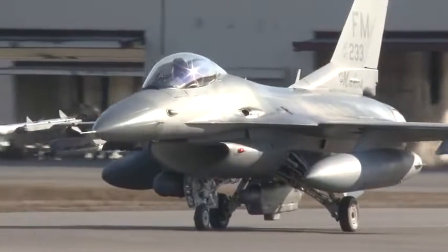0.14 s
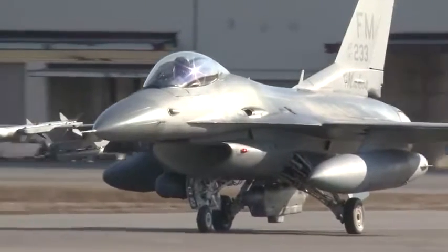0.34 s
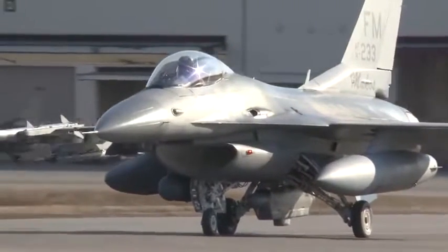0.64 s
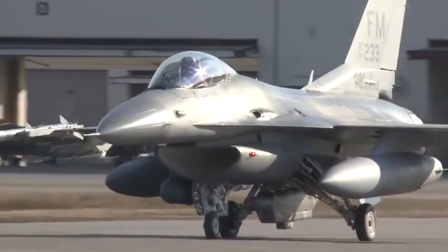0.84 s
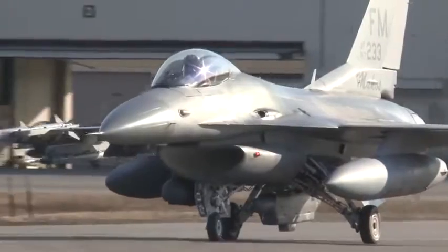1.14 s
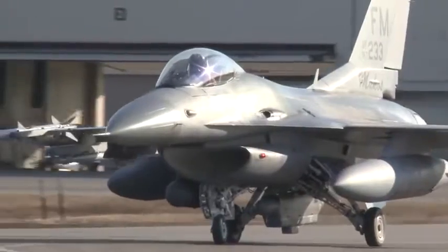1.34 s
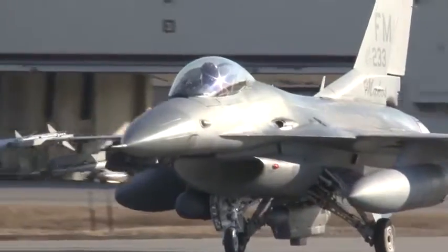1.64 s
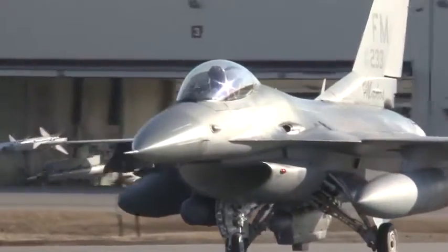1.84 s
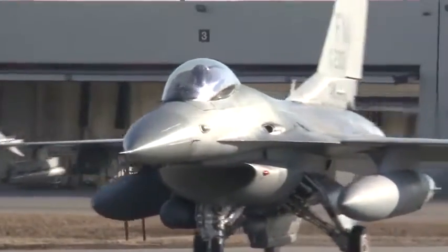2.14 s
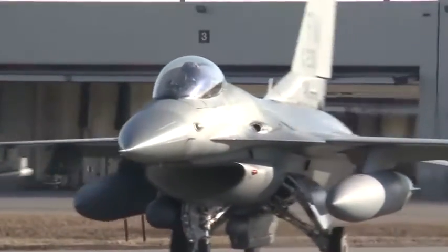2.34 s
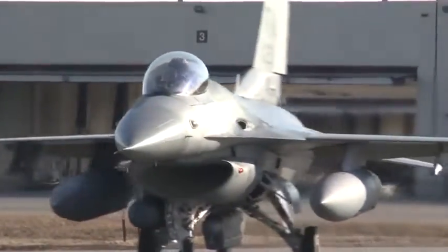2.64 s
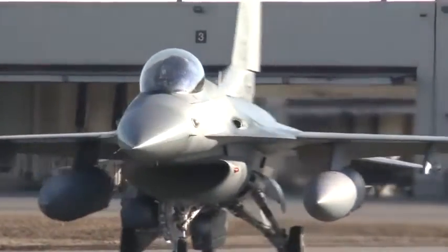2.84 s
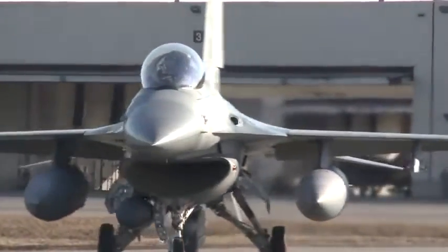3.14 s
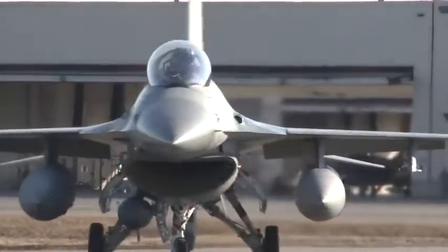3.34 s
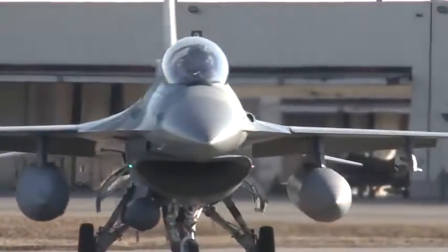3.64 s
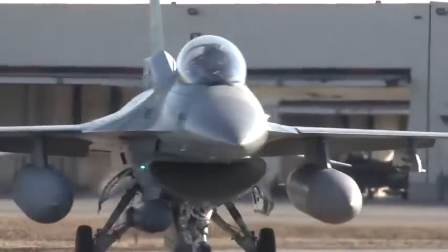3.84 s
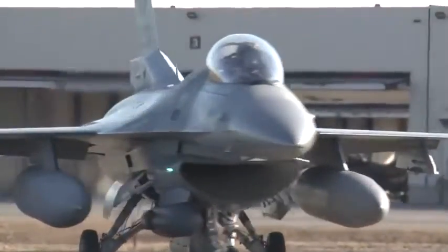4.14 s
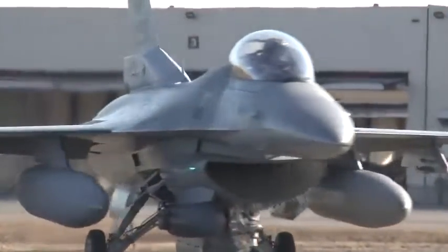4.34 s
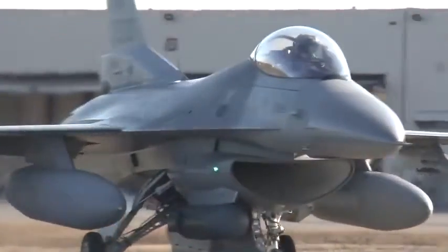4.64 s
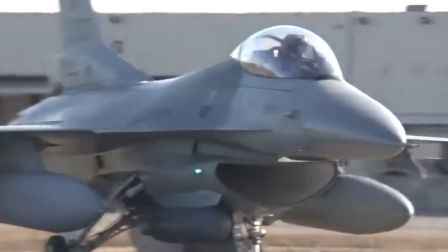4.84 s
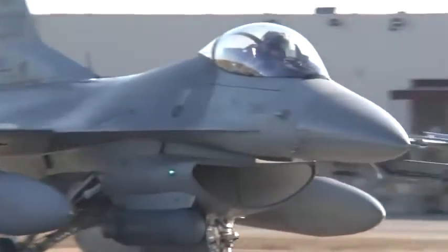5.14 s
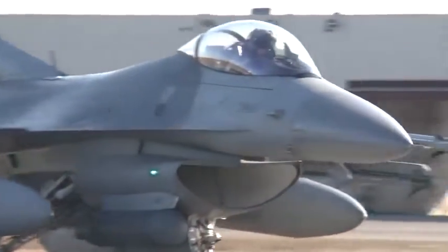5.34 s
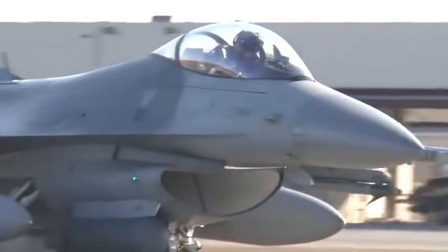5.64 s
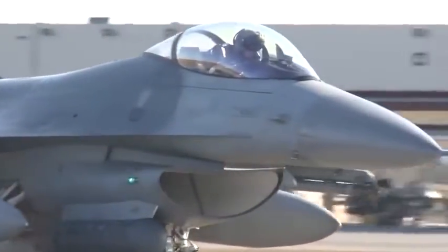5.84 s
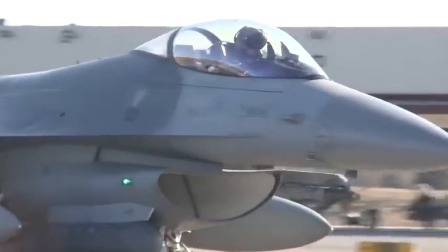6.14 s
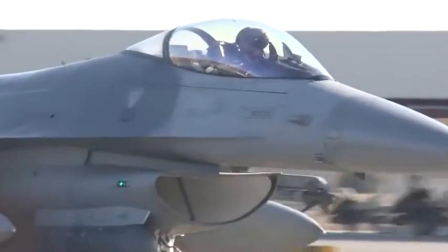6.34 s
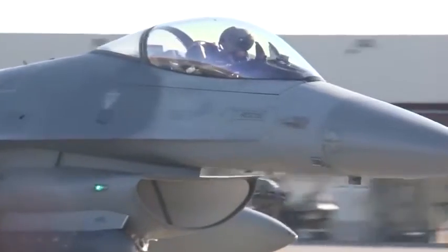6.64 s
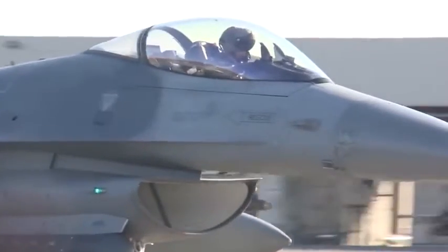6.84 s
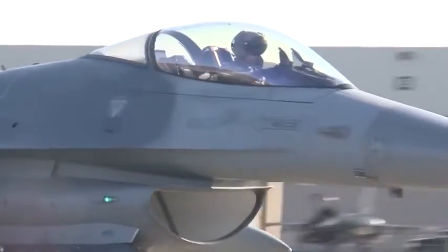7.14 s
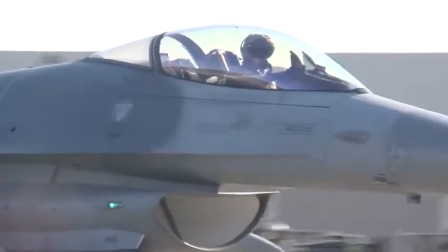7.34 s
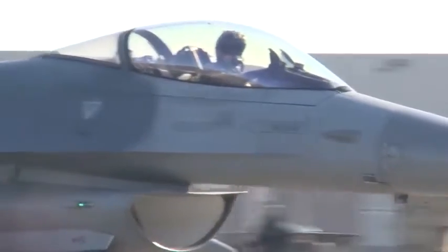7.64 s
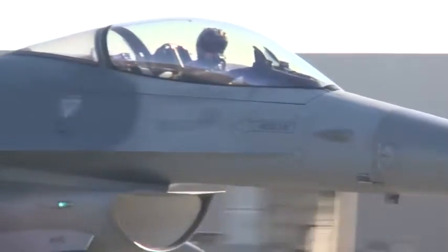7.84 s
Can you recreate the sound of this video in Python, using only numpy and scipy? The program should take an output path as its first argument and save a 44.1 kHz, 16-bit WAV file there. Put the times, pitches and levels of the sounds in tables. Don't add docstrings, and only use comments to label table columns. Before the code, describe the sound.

A fighter jet taxis on an open airfield, heard continuously from start to finish. From 0 s a piercing fan whine near 1.84 kHz stands over gusty inlet roar, light hiss and a soft low rumble. The whine swells around 1.3 s, sinks very slightly in pitch, and is lowest and purest near 3.5 s, when the intake faces the listener and the rumble almost vanishes. From about 4.5 s it climbs slightly, then dips briefly in strength around 5.5 and 6 s. As the jet swings side-on, the tone blurs into a rougher, wider buzz; by 7 to 8 s hiss, sizzle and exhaust rumble are strongest, and the sound stays on without an ending. Thin shimmering tones from distant idling engines come and go. The image leans left, diffuse and phasey, with treble cut off steeply and patchy, flickering highs.

```python
import sys
import numpy as np
from scipy import signal
from scipy.fft import rfft, irfft, next_fast_len
from scipy.io import wavfile
from scipy.ndimage import uniform_filter1d, map_coordinates

SR = 44100
rng = np.random.default_rng(int(sys.argv[2]) if len(sys.argv) > 2 else 0)


def generate_wav(sig):
    pcm = np.round(np.clip(np.atleast_2d(sig).T, -1, 1) * 32767).astype(np.int16)
    wavfile.write(sys.argv[1], SR, pcm)


def field_ratio(decibels):
    return 10 ** (np.asarray(decibels, dtype=float) / 20)


N = 352800


def unit(x):
    return x / np.sqrt(np.mean(np.abs(x) ** 2) + 1e-20)


def along(points, hz):
    f, v = np.transpose(points)
    return np.interp(np.log(hz + 1), np.log(f + 1), v, left=-120, right=-120)


def curves(rows):
    s, *cols = np.transpose(rows)
    return [np.interp(np.arange(N) / SR, s, c) for c in cols]


def wobble(rate):
    knots = rng.standard_normal(400)
    return map_coordinates(knots, [np.arange(N) * np.clip(rate, 0, 45) / SR])


def filtered(x, response):
    m = next_fast_len(N + SR // 2)
    return irfft(rfft(x, m) * response(np.fft.rfftfreq(m, 1 / SR)), m)[..., :N]


def patched(x, patchy_db, tall=8, long=6):
    z = signal.stft(x, nperseg=512)[2]
    field = uniform_filter1d(rng.standard_normal(z.shape), size=tall, axis=0)
    field = uniform_filter1d(field, size=long, axis=1)
    return signal.istft(z * field_ratio(patchy_db * unit(field)), nperseg=512)[1][:N]


def rush(spectrum, patchy_db, **shape):
    noise = patched(rng.standard_normal(N), patchy_db, **shape)
    return unit(filtered(noise, lambda hz: field_ratio(along(spectrum, hz))))


def scatter(blur_hz, count=9000):
    hz = np.fft.fftfreq(count, N / SR / count)
    white = rng.standard_normal(count) + 1j * rng.standard_normal(count)
    sway = unit(np.fft.ifft(white * np.exp(-(hz / blur_hz) ** 2)))
    return np.interp(np.arange(N) * count / N, np.arange(count), sway)


def tones(lines):
    t = np.arange(N) / SR
    return sum(field_ratio(db) * (scatter(blur_hz=25) * np.exp(2j * np.pi * hz * t)).real for hz, db in lines)


# time in seconds, level in dB.
WHINE_LEVEL = [(0, -32.5), (.4, -30.5), (.65, -33), (.95, -30), (1.25, -26.5), (1.5, -32), (2.0, -29.5),
               (2.8, -31.5), (4.3, -32.5), (4.75, -30), (5.2, -29), (5.5, -36), (5.68, -32.5), (5.95, -39),
               (6.2, -32), (6.65, -32), (7.1, -32.5), (8, -34.5)]
# time in seconds, blade tone in Hz, core blur in Hz, wide skirt in dB.
WHINE_PITCH = [
    (0, 1838, 30, -9),
    (1.5, 1829, 28, -11),
    (2.5, 1825, 26, -11),
    (3.5, 1822, 23, -12),
    (4.5, 1831, 32, -9),
    (5.5, 1838, 36, -6),
    (6.5, 1840, 42, -3),
    (7.1, 1845, 48, 0),
    (8, 1845, 50, 2),
]
# multiple of the blade tone, level in dB, blur in Hz.
OVERTONES = [
    (2, -52, 36),
    (3, -72, 120),
]


def fan():
    tone_hz, blur, skirt_db = curves(WHINE_PITCH)
    level_db, = curves(WHINE_LEVEL)
    turn = 2j * np.pi * np.cumsum(tone_hz) / SR
    share = np.clip((blur - 20) / 30, 0, 1)
    core = np.sqrt(1 - share) * scatter(blur_hz=28) + np.sqrt(share) * scatter(blur_hz=61.7)
    core = unit(core / (np.abs(core) + 2.4) ** 0.48)

    fade_db, fades_per_s, steady_s = 1.6, 22, .25
    whine = field_ratio(fade_db * wobble(fades_per_s)) * core
    near_skirt = field_ratio(1.23 * skirt_db + 1.0) * scatter(blur_hz=114)
    far_skirt = field_ratio(2.8 * skirt_db - 2.5) * scatter(blur_hz=260)
    whine = whine + near_skirt * np.exp(.012 * turn)
    whine = whine + far_skirt * np.exp(.03 * turn)
    whine = whine / np.sqrt(uniform_filter1d(np.abs(whine) ** 2, size=round(steady_s * SR)))

    octave = field_ratio(.9 * skirt_db - 47) * scatter(blur_hz=100) * np.exp(2.05 * turn)
    facing_db = -.3 * (skirt_db + 10)
    clear = sum(field_ratio(db + facing_db) * scatter(blur_hz) * np.exp(k * turn) for k, db, blur_hz in OVERTONES)
    whine_db = level_db + 5.5
    return (field_ratio(whine_db) * whine * np.exp(turn) + octave + clear).real


# time in seconds, level in dB.
INLET_LEVEL = [(0.0, -42), (0.11, -38.5), (0.27, -41.5), (0.82, -46.5), (1.72, -43), (1.89, -38),
               (2.14, -43), (2.69, -41.5), (4.14, -43), (4.63, -37.5), (5.5, -40), (5.64, -37), (5.97, -42),
               (6.24, -37.5), (6.71, -41), (7.24, -37), (7.48, -40.5), (8.0, -39)]
# frequency in Hz, density in dB per Hz.
ROAR = [(1500, -12), (1700, -6.5), (1950, 3.5), (2080, -5), (2350, 3), (2500, -2.5), (2640, 0), (3080, -13),
        (3450, -5.5), (3750, -7), (4100, -15.5), (4500, -18), (5020, -31), (5200, -47)]
HISS = [(3700, -43), (4200, -3), (4700, -7), (5030, -7), (5500, -0.5), (6000, -5), (7000, -9.5), (7750, -8),
        (8400, -10.5), (9000, -14), (9750, -18), (9850, -56)]
SIZZLE = [(9500, -40), (9800, -3.5), (10060, -1.5), (10300, -3), (10500, -3.5), (11200, -7), (11400, -9),
          (13100, -12), (13400, -16), (14500, -11.5), (15800, -15), (16000, -14)]
# frequency in Hz, level against their noise in dB.
HISS_LINES = [(5515, -19)]
SIZZLE_LINES = [(10063, -13), (10500, -21)]


def inlet():
    roar_db, = curves(INLET_LEVEL)
    flicker = wobble(14) + 0.26 * wobble(7.7)
    roar = field_ratio(roar_db + 3 + 0.79 * flicker) * rush(ROAR, patchy_db=0.55)
    hiss = rush(HISS, patchy_db=-0.25, tall=24, long=4) + tones(HISS_LINES)
    sizzle = rush(SIZZLE, patchy_db=1.5, tall=24, long=4) + tones(SIZZLE_LINES)
    hiss_db = -54.5 + follow(inlet=0.25, nearness=0.67, nozzle=0.27)
    hiss_db = hiss_db + .8 * flicker + .5 * wobble(9)
    sizzle_db = -62.5 + follow(inlet=0.71, nearness=0.97, nozzle=0.18)
    sizzle_db = sizzle_db + .8 * flicker + .4 * wobble(6)
    return roar + field_ratio(hiss_db) * hiss + field_ratio(sizzle_db) * sizzle


# time in seconds, level in dB.
NOZZLE_LEVEL = [(0.0, -45), (0.44, -49.5), (0.78, -45), (0.93, -53.5), (0.98, -46), (1.76, -54.5),
                (1.94, -48.5), (2.07, -55.5), (2.85, -59.5), (4.19, -59), (4.45, -53), (5.21, -55),
                (6.71, -48.5), (6.97, -45), (7.82, -44), (8.0, -39)]
# frequency in Hz, density in dB per Hz.
RUMBLE = [(15, -66), (25, -45), (65, -20.5), (188, -1.5), (205, -2), (286, -8.5), (345, -10), (382, -6),
          (468, -11.5), (625, -10), (800, -20), (1040, -55), (1760, -120)]
BODY = [(180, -26), (300, -8), (419, -4), (574, -5.5), (625, -4.5), (906, -5.5), (1050, -3.5), (1360, -8.5),
        (1650, -3.5), (2140, -42), (3630, -120)]


def exhaust():
    nozzle_db, = curves(NOZZLE_LEVEL)
    rumble_db = nozzle_db + 3 + 0.59 * wobble(7.4)
    rumble = field_ratio(rumble_db) * rush(RUMBLE, patchy_db=-0.2)
    body_db = -48.5 + follow(inlet=0.27, nearness=0.028, nozzle=0.54) + 0.56 * wobble(7.2)
    return rumble + field_ratio(body_db) * rush(BODY, patchy_db=1.0)


# time in seconds, gain at the top in dB.
NEARNESS = [(0, 1), (1, -1), (2.3, 0.5), (3, 7.5), (4, 2.5), (5, 5), (6.1, 6), (7, 10.5), (8, 14.5)]


def follow(inlet, nearness, nozzle):
    change_db = 0
    for share, rows in ((inlet, INLET_LEVEL), (nearness, NEARNESS), (nozzle, NOZZLE_LEVEL)):
        db, = curves(rows)
        change_db = change_db + share * (db - db.mean())
    return change_db


# frequency in Hz, level in dB, start and end in seconds.
FAR_SHAFTS = [(638, -60, -.5, 2.6), (1027, -56.5, 1.2, 2.7), (1027, -65, 2.5, 3.9), (857, -61, 3.8, 6.2),
              (798, -62, 5.1, 6.7), (638, -55.5, 5.8, 7.6), (1275, -56.5, 7.0, 8.6)]
# frequency in Hz, level in dB, start and end in seconds, drift in Hz per s.
FAR_FANS = [
    (1823, -29, .8, 1.7, 0),
    (1826, -30, 2.6, 4.6, 0),
    (1850, -32, 4.9, 7.1, 7),
    (1824, -32, 5.9, 7.8, -7),
]


def far_tone(hz, db, start, end, drift=0):
    t = np.arange(N) / SR
    seen = np.clip(np.minimum(t - start, end - t) / .4, 0, 1)
    cycles = (hz + drift * (t - start) / 2) * (t - start)
    shimmer = 1 + .4 * scatter(blur_hz=5)
    return field_ratio(db) * seen * (shimmer * np.exp(2j * np.pi * cycles)).real


def idlers():
    return sum(far_tone(*row) for row in FAR_SHAFTS) + sum(far_tone(*row) for row in FAR_FANS)


def scene():
    return np.tile(fan() + inlet() + exhaust() + idlers(), (2, 1))


LINKS = [(3, .43, .6514), (4, .75, .5647), (5, .347, .4895)]


def smear(hz):
    u = hz / 375
    step = np.where(u < 1, 1 / 4, np.where(u < 3, 1 / 2, 1))
    centre = (np.floor(u / step) + .5) * step
    slot = np.exp(-1j * np.pi * u)
    fade = np.clip(1 - .05 * (np.floor(u) - 3), 0, 1)
    chain = slot ** 2 * np.exp(-.39j * np.pi * centre)
    for delay, turn, feedback in LINKS:
        link = slot ** delay * np.exp(-1j * np.pi * turn * centre)
        chain = chain * (link - feedback * fade) / (1 - feedback * fade * link)
    return np.where(u < 23, chain, np.where(u < 35, slot ** 14, slot))


# band start in Hz, left over right in dB, left-right likeness from -1 to 1.
WIDTH = [(0, 20, .48), (94, 15.5, .97), (188, 10, .75), (284, 7.5, -.02), (378, 8, -.47), (583, 7.5, -.45),
         (763, 10, -.95), (920, 9.5, -.33), (1125, 8, -.31), (1505, 11, -.89), (1841, 10, -.64),
         (2144, 16.5, .61), (2580, 11, .86), (2960, 9, 1), (3350, 1.2, .88), (4125, 2, .66),
         (5250, 1.8, .9), (6750, .4, .97), (8625, 11, 1), (8850, 13, .4), (9750, 13.5, .24),
         (13125, 17, .2), (14950, 20, .2)]


def shares(hz):
    start, balance_db, alike = np.transpose(WIDTH)
    row = np.clip(np.searchsorted(start, hz) - 1, 0, None)
    right = np.sqrt(2 / (1 + field_ratio(2 * balance_db[row])))
    left = right * field_ratio(balance_db[row])
    spread = np.arccos(np.clip(alike[row], -1, 1)) / 2
    lean = spread * (right - left) / np.sqrt(2)
    return np.array([left * np.exp(1j * (lean + spread)), right * np.exp(1j * (lean - spread))])


# start in seconds, length in seconds.
DROPOUTS = [(0.23, 0.07), (0.62, 0.17), (1.12, 0.08), (2.945, 0.08), (4.32, 0.08), (4.97, 0.11),
            (5.6, 0.08), (5.81, 0.08), (6.02, 0.06), (6.76, 0.08), (7.42, 0.09), (7.56, 0.16)]
# frequency in Hz, level in dB.
KEPT = [(4000, -110), (5030, -62), (5300, -84), (9700, -82), (11500, -77), (16000, -78)]


def starve(x, hop=1024, start=395):
    k, n = np.arange(hop) + .5, np.arange(2 * hop)
    window = signal.windows.kaiser_bessel_derived(2 * hop, 4 * np.pi)
    basis = window * np.cos(np.pi / hop * np.outer(k, n + .5 + hop / 2)) * np.sqrt(2 / hop)
    padded = np.pad(x, ((0, 0), (2 * hop - start, 2 * hop)))
    blocks = padded[:, :(N // hop + 4) * hop].reshape(2, -1, hop)
    c = np.concatenate([blocks[:, :-1], blocks[:, 1:]], axis=2) @ basis.T
    hz = k * SR / hop / 2
    t = (np.arange(c.shape[1]) * hop + start - hop) / SR

    right_db = -15 * np.arange(2)[:, None, None]
    floor = field_ratio(2 * along(KEPT, hz) + 2 * right_db)
    c = c * (uniform_filter1d(c ** 2, size=7, axis=2) > floor) * (hz < 15750)
    coarse = np.interp(hz, [3000, 5000, 9500, 11500], [0, .1, .1, .5])
    c = c * (c ** 2 > coarse * uniform_filter1d(c ** 2, size=32, axis=2))

    spells = sum((t > s) & (t < s + length) for s, length in DROPOUTS)
    brief = np.repeat(rng.random(len(t)) < .05, 2)[:len(t)]
    idle = spells + brief > 0
    c = c * ~(idle[:, None] & (hz > 8270) & (hz < 8960))
    top = hz > 15160
    top_power = np.mean(c[..., top] ** 2, axis=2, keepdims=True)[:1]
    too_weak = top_power < field_ratio(2 * -72.5 + 2 * rng.standard_normal((len(t), 1)))
    c = c * ~(top & too_weak)
    c[1] *= (hz < 8960) | (hz > 9650)
    y = c @ basis
    overlapped = (y[:, :-1, hop:] + y[:, 1:, :hop]).reshape(2, -1)
    return overlapped[:, hop - start:][:, :N]


def roll_off(x):
    return signal.sosfilt(signal.butter(12, 16300, fs=SR, output="sos"), x)


def record(dry):
    mono = filtered(dry.mean(0), lambda hz: 1 - .6 * np.exp(-((hz - 5035) / 70) ** 2))
    copy = patched(filtered(mono, smear), patchy_db=-0.5, tall=5, long=8)
    wide = filtered(mono, lambda hz: shares(hz).real) + filtered(copy, lambda hz: shares(hz).imag)
    wide[1] = patched(wide[1], patchy_db=2.0, tall=6, long=6)
    return roll_off(starve(wide))


dry = scene()
out = record(dry)
generate_wav(out)
```